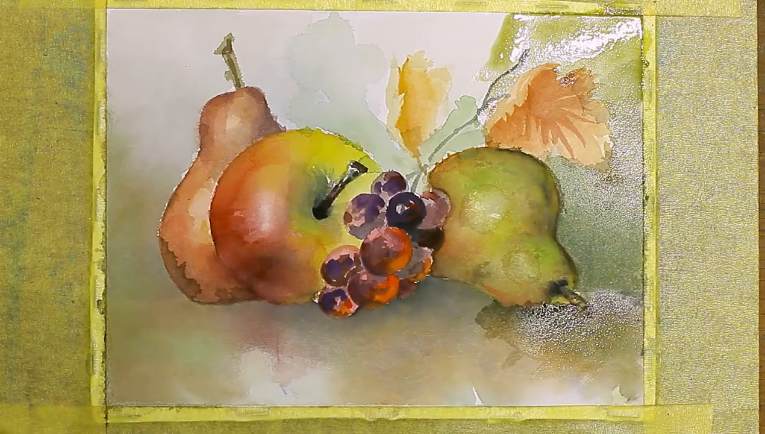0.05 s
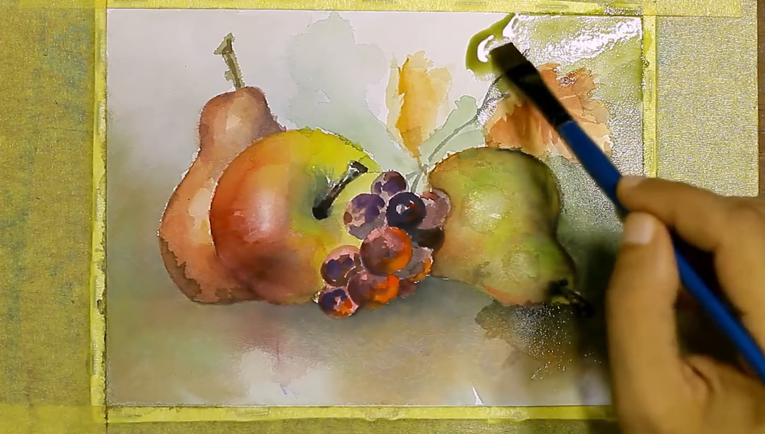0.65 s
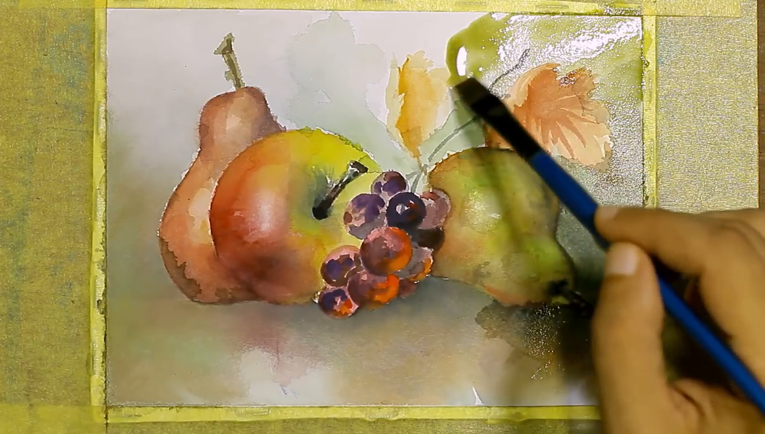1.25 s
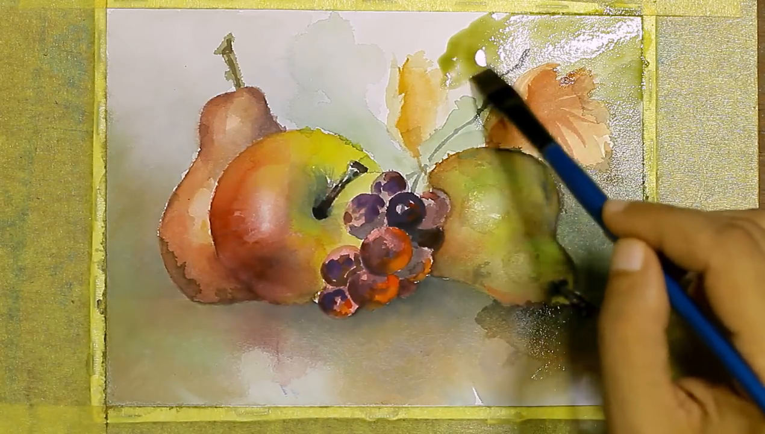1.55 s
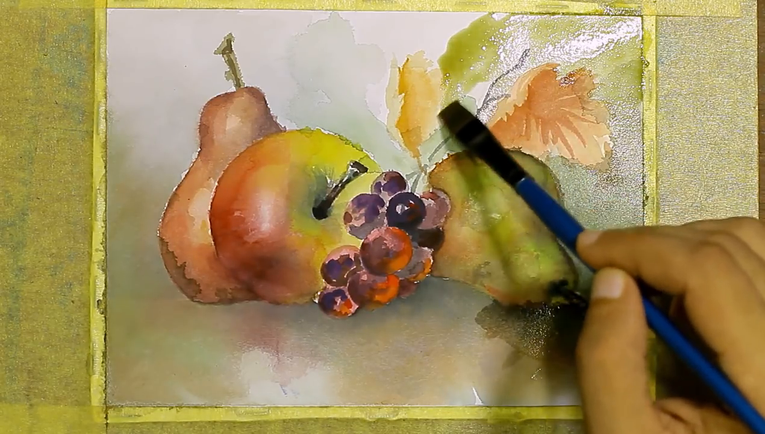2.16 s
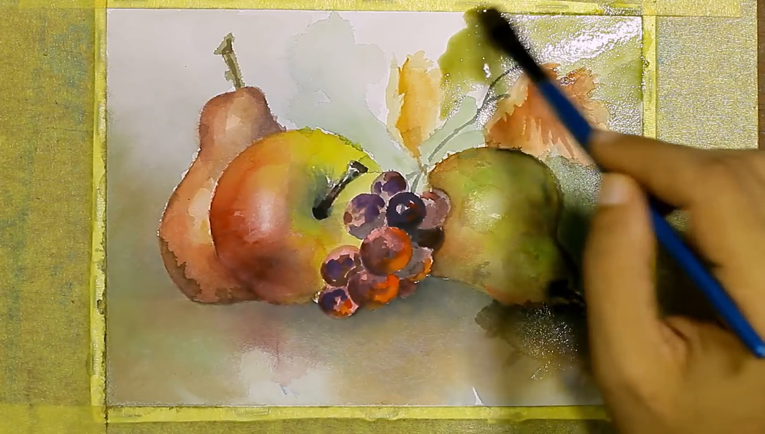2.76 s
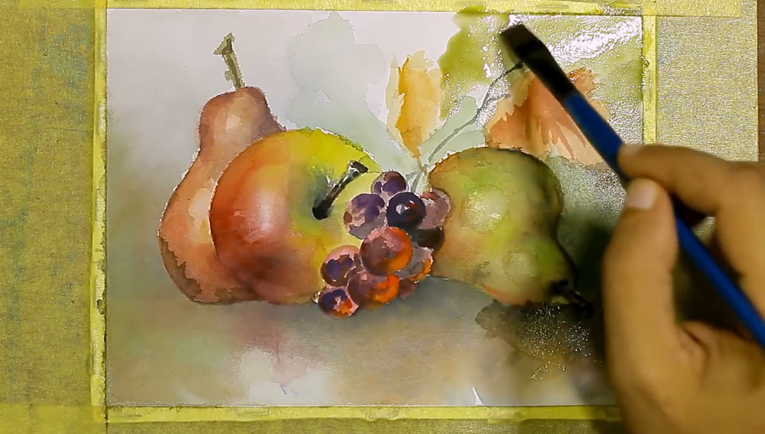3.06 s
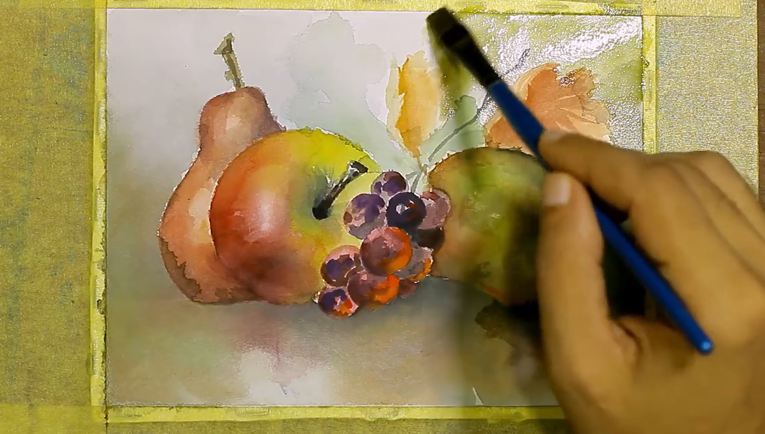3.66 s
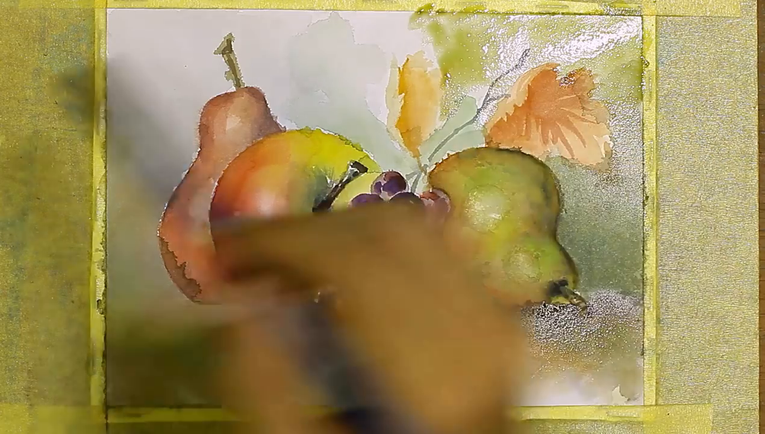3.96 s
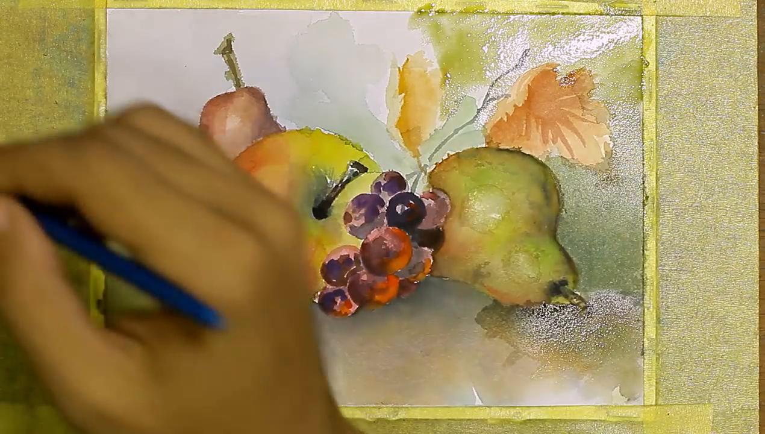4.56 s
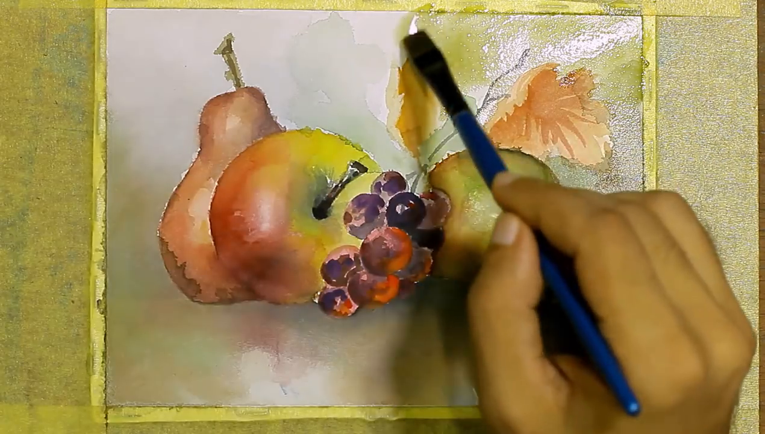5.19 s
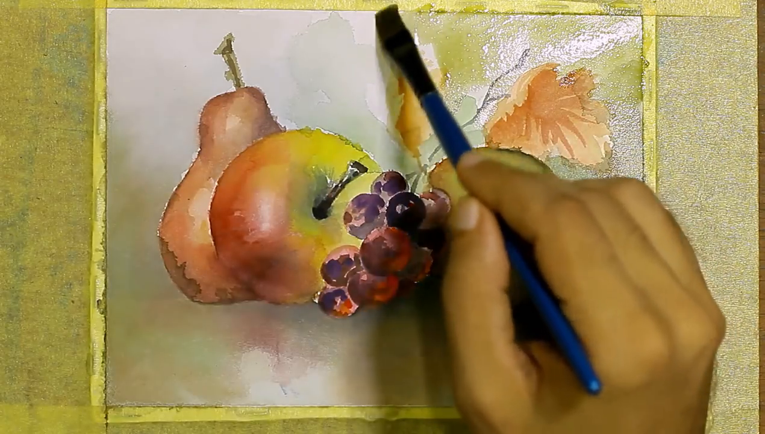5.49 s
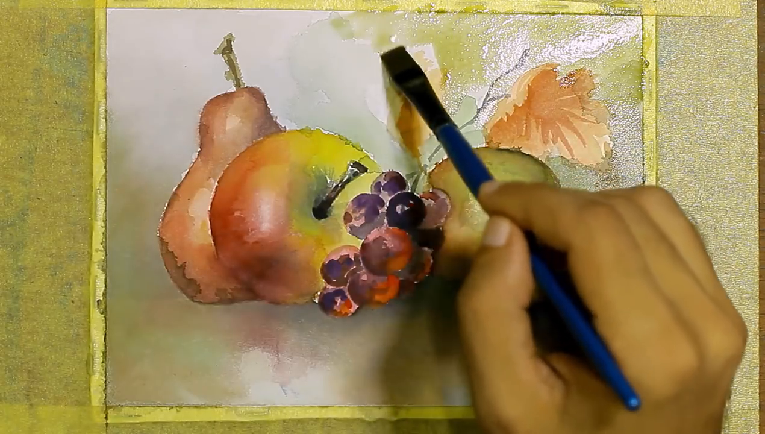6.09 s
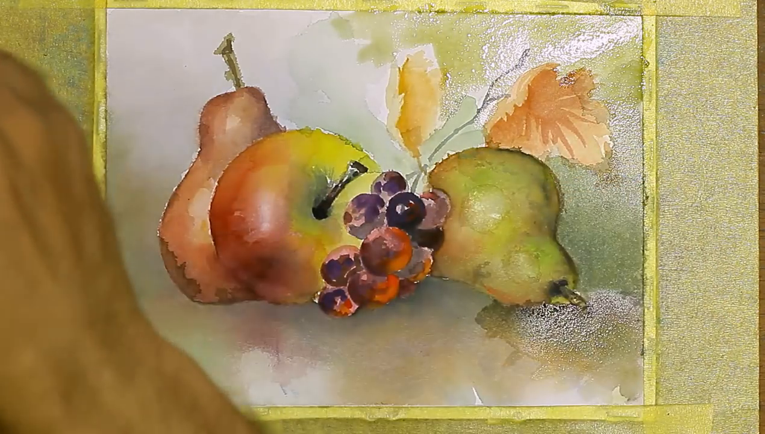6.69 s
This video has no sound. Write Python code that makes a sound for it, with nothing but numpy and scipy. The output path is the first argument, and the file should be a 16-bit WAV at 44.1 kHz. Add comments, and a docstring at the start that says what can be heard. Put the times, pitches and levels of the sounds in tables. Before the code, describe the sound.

Close to the microphone, a paintbrush is handled on a desk indoors over a soft, steady fan hum. One small tap comes first, then several light clicks and a brief slide on a rim, building to three hard, quick cracks against the palette and water pot, each with a very short ring. Two barely audible ticks follow, and the hum carries on.

```python
"""A paintbrush knocks against a hard palette and a water pot on a desk, close to the microphone.
Each contact is a short crack with a few quickly damped rings; some have a dull thump under them, and twice
the brush slides on the rim. A brief noisy decay follows each click, then a faint dull tail. A fan and
mains hum run underneath, and the recorder's limiter ducks them after the hardest clicks."""
import sys
import numpy as np
from scipy import signal
from scipy.fft import rfft, irfft, next_fast_len
from scipy.io import wavfile
from scipy.ndimage import uniform_filter1d

SR = 44100
rng = np.random.default_rng(int(sys.argv[2]) if len(sys.argv) > 2 else 0)


def unload_audio(sound):
    """Save the sound as a 16-bit wav file, at the path given as the first command line argument."""
    columns = np.transpose(np.atleast_2d(sound))
    # keep every value between -1 and 1, then stretch to whole-number steps
    steps = np.round(np.clip(columns, -1, 1) * 32767)
    wavfile.write(sys.argv[1], SR, steps.astype(np.int16))


N = 301485
T = np.arange(N) / SR

# Colour of the contact crack. Each row: frequency in Hz, relative gain in dB.
CRACK_COLOUR = [(120, -29), (320, -3.5), (550, -10.5), (1100, -10), (2000, -2), (4200, -1.5), (8000, 2),
                (11000, -4), (13500, -14), (15500, -20)]


def brush_clicks(crack_t60_s=.019, second_ring_db=-3, radiate_hz=550):
    """Each contact cracks, shakes the palette and sets off two rings at the spot that is hit."""
    # Each row: start in seconds, level in dB, treble cutoff in Hz, palette against crack in dB,
    # main ring in Hz, rings against crack and palette in dB, main ring's t60 in seconds, second ring in Hz.
    contacts = [ (1.7228, -24, 10600, -7, 5970, 0, 0.012, 4200),
                (3.8953, -19.5, 6900, -2.5, 2212, 2, 0.057, 4140),
                (3.9759, -22, 8050, -6, 5900, -4.5, .007, 4570),
                (4.019, -47, 6500, 0, 4400, -5, .020, 3100), (4.029, -49.5, 6500, -6, 3100, -1, .020, 4400),
                (4.1634, -32.5, 3200, -20, 1870, -4, 0.021, 2360),
                (4.1990, -46, 5500, -4, 1850, -7, .015, 3800), (4.41, -36, 5500, -13, 4830, 0, .013, 3780),
                (4.6660, -25, 8500, -9, 4330, -1.5, .013, 6200),
                (4.7706, -.5, 11600, -8, 6480, -6.5, 0.013, 8120),
                (4.7768, -21.5, 10000, -11, 2070, -2, .014, 6760),
                (4.8531, -8.5, 8700, -2.5, 5850, 1.5, 0.015, 4300),
                (4.855, -35, 8500, -7, 6200, -3, .010, 7900),
                (4.934, -4, 11800, -8, 6050, 5.5, .0057, 8100),
                (5.6150, -48, 2800, -7, 2660, -2, .060, 2420), (6.3762, -44, 4500, -2, 1740, 8, .020, 3120)]
    out, t = np.zeros(N), T[:SR // 8]
    force = press(t)
    bass_cut = signal.butter(1, radiate_hz, "high", fs=SR, output="sos")  # small things radiate little bass
    for s, db, bright_hz, palette_db, main_hz, ring_db, t60, second_hz in contacts:
        crack = unit(colour(rng.standard_normal(len(t)) * force * fade(t, crack_t60_s), CRACK_COLOUR))
        body = crack + undb(palette_db) * unit(force * palette(t))
        body = unit(soften(body, bright_hz))
        rings = unit(force * ring(t, main_hz, t60))
        rings += undb(second_ring_db) * unit(force * ring(t, second_hz, t60 / 2))
        click = signal.sosfilt(bass_cut, body + undb(ring_db) * rings)
        add(out, s, short_wash(hit_level(click, db)))
    return out


def press(t, rise_s=.000092):
    """The contact force takes a moment to build."""
    return 1 - np.exp(-t / rise_s)


def palette(t, scatter_db=2):
    """The palette rings; each point of contact weights its modes differently."""
    # Each row: frequency in Hz, relative level in dB, t60 in seconds.
    modes = [(1920, 4, 0.01), (2220, -10.5, 0.02), (2660, -1, 0.015), (3405, 7, 0.0084), (4280, 5.5, 0.033),
             (4520, 5, 0.0099), (5700, -24, 0.011), (6970, -7.5, 0.008), (6470, -3, 0.0092), (7400, 1, .02),
             (7430, 7, 0.0031), (9760, -25, 0.0091), (10320, -36, 0.022)]
    weights = undb(scatter_db * rng.standard_normal(len(modes))) * rng.choice([-1, 1], len(modes))
    return unit(sum(w * undb(db) * ring(t, hz, t60) for w, (hz, db, t60) in zip(weights, modes)))


def low_thumps():
    """A short, dull low thump sounds under some of the hardest clicks."""
    # Each row: start in seconds, level in dB, frequency in Hz, t60 in seconds.
    thumps = [(1.7241, -47, 200, 0.0077), (3.8949, -35.5, 910, 0.0056), (4.7712, -28, 372, 0.039),
              (4.8560, -38, 910, 0.013), (4.934, -31, 110, 0.0038)]
    out, t = np.zeros(N), T[:SR // 8]
    for s, db, hz, t60 in thumps:
        thump = np.gradient(press(t) * ring(t, hz, t60))  # the slope leaves no net push of air
        add(out, s, short_wash(hit_level(thump, db)))
    return out


def rim_scrapes(bright_hz=5500, grit_db=4, palette_db=-4):
    """The brush slides on the rim: dense tiny slips swell quickly and die away, ringing the palette."""
    # Each row: start in seconds, length in seconds, level in dB.
    slides = [(4.41, 0.052, -49.5), (6.372, 0.027, -61)]
    out = np.zeros(N)
    for s, length, db in slides:
        n = int(length * SR)
        size, slip = rng.standard_normal((2, SR // 8))[:, :n]
        pressure = np.sin(np.pi * np.sqrt(np.arange(n) / n)) ** 2
        slips = slip * undb(grit_db * size) * pressure
        ringing = signal.fftconvolve(slips, palette(T[:n]))[:n]
        scrape = unit(colour(slips, CRACK_COLOUR)) + undb(palette_db) * unit(ringing)
        add(out, s, level(soften(scrape, bright_hz), db))
    return out


def short_wash(x, wash_db=-9, build_s=.003, t60=.06):
    """A brief noisy decay follows a hit, different each time."""
    t = T[:SR // 8]
    wash = rng.standard_normal(len(t)) * (1 - np.exp(-(t / build_s) ** 2)) * fade(t, t60)
    return x + undb(wash_db) * signal.fftconvolve(x, unit(wash))[:len(x)]


def dull_tail(x, tail_db=-25, dull_hz=4500, build_s=.005, t60=.16):
    """A faint, dull tail trails the close sounds."""
    t = T[:SR // 2]
    tail = soften(rng.standard_normal(len(t)), dull_hz) * (1 - np.exp(-t / build_s)) * fade(t, t60)
    return x + undb(tail_db) * signal.fftconvolve(x, unit(tail))[:N]


def fan_air(db=-55, waver_db=.26):
    """Smooth air noise of the fan and the room, wavering slightly."""
    # Each row: frequency in Hz, relative gain in dB.
    air_colour = [(20, -21), (40, -19), (85, -16), (108, -5), (145, -8), (185, -1.5), (240, 1.5), (400, -1),
                  (1350, -1.5), (1750, -4), (2100, -6), (5000, -12.5), (8500, -18), (12000, -26),
                  (15000, -36.5)]
    air = level(colour(rng.standard_normal(N), air_colour), db)
    return air * undb(waver_db * walk(6))


def fan_drone(hz=206.7, wobble_rad=.55, rise_s=.03, fall_s=.013, rest_db=-87, trim_db=-1):
    """The fan's drone comes and goes: each spell rises quickly, holds and falls away."""
    # Each row: start in seconds, length in seconds, level in dB before the trim.
    spells = [(0.234, 0.5, -62), (1.283, 0.67, -62), (1.978, 0.17, -63), (2.199, 0.27, -61),
              (2.778, 0.038, -59), (2.949, 0.53, -62), (3.658, 0.056, -60), (3.793, 0.118, -61.5),
              (3.973, 0.84, -62), (5.011, 0.071, -57), (5.172, 0.22, -60), (5.633, 1.18, -61.5)]
    swell = np.full(N, undb(rest_db))
    for s, length, db in spells:
        rise, fall = (T - s) / rise_s, (s + length - T) / fall_s
        swell = np.maximum(swell, undb(db) * np.clip(.5 + np.minimum(rise, fall), 0, 1))
    return swell * level(np.sin(2 * np.pi * hz * T + wobble_rad * walk(13)), trim_db)


def whines():
    """Faint tones of the mains and the fan casing, each a narrow band of noise."""
    # Each row: frequency in Hz, width in Hz, level in dB.
    tones = [(285, 6, -77), (318, 13, -75), (1279, 30, -71.5), (1682, 8, -73)]
    out = np.zeros(N)
    for hz, width, db in tones:
        drift = walk(width) + 1j * walk(width)
        out += level((drift * np.exp(2j * np.pi * hz * T)).real, db)
    return out


def mains_hum(hz=119.8, db=-70.5):
    """The mains hum on one low, steady tone."""
    return level(np.sin(2 * np.pi * hz * T), db)


def undb(db):
    """Decibels to gain."""
    return 10 ** (np.asarray(db) / 20)


def unit(x):
    """Scale to an energy of one."""
    return x / np.sqrt(np.sum(x ** 2))


def level(x, db):
    """Scale to an rms level."""
    return x * undb(db) / np.sqrt(np.mean(x ** 2))


def hit_level(x, db):
    """Scale a hit so that its energy, spread over 2 ms, has this rms level."""
    return unit(x) * undb(db) * np.sqrt(SR * .002)


def fade(t, t60):
    """Exponential decay, 60 dB down at t60."""
    return np.exp(-np.log(1000) * t / t60)


def ring(t, hz, t60):
    """One struck mode of unit energy."""
    return unit(np.sin(2 * np.pi * hz * t) * fade(t, t60))


def colour(x, points):
    """Causal filter through (Hz, dB) points, built from the cepstrum of its log gain."""
    size = 2 * next_fast_len(len(x))
    hz, db = np.transpose(points)
    f = np.maximum(np.fft.rfftfreq(size, 1 / SR), 1)
    gain = undb(np.interp(np.log(f), np.log(hz), db))
    cepstrum = np.fft.irfft(np.log(gain))
    cepstrum[1:size // 2] *= 2
    cepstrum[size // 2 + 1:] = 0
    return irfft(rfft(x, size) * np.exp(rfft(cepstrum)))[:len(x)]


def soften(x, hz):
    """Roll off the treble above hz."""
    return signal.sosfilt(signal.butter(2, hz, fs=SR, output="sos"), x)


def walk(rate):
    """Random drift with an rms of one, turning rate times a second."""
    k = int(SR / rate)
    steps = np.repeat(rng.standard_normal(N // k + 1), k)
    return level(uniform_filter1d(steps, k)[:N], 0)


def add(out, s, x):
    """Mix x in at s seconds."""
    i = int(s * SR)
    out[i:i + len(x)] += x[:N - i]


def scene():
    """One microphone close to the brush, with the fan and the hum behind."""
    brush = dull_tail(brush_clicks() + low_thumps() + rim_scrapes())
    background = fan_air() + fan_drone() + whines() + mains_hum()
    return (brush + background)[None]


def limiter(x, threshold_db=-11.5, release_db_per_s=55, ceiling=.6):
    """The gain drops at once on a loud millisecond and creeps back; peaks that get through are rounded."""
    power = uniform_filter1d(x ** 2, size=45)
    loud_db = 10 * np.log10(np.maximum(power, 1e-18))
    held_db = np.maximum.accumulate(loud_db + release_db_per_s * T, axis=-1) - release_db_per_s * T
    gain = uniform_filter1d(undb(np.minimum(threshold_db - held_db, 0)), size=15)
    return ceiling * np.tanh(x * gain / ceiling)


def record(dry):
    """The recorder limits the hardest clicks and cuts the top above 15.5 kHz."""
    top_cut = signal.ellip(8, .2, 70, 15500, fs=SR, output="sos")
    return signal.sosfilt(top_cut, limiter(dry))


dry = scene()
out = record(dry)
unload_audio(out)
```